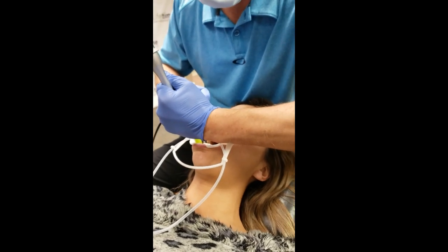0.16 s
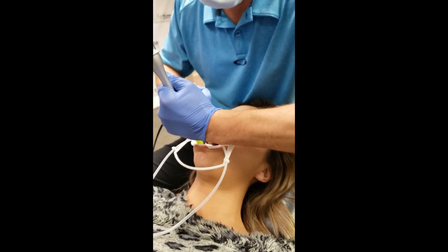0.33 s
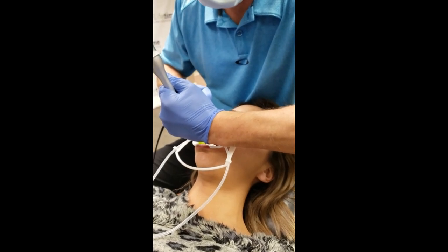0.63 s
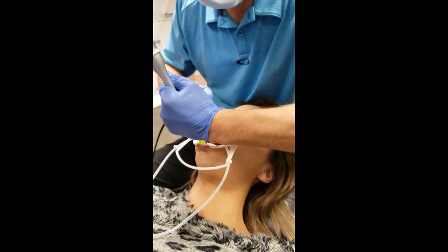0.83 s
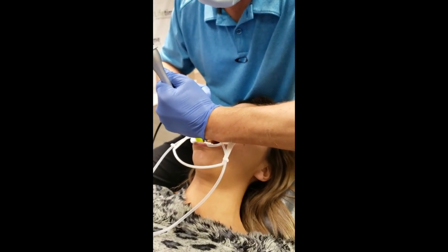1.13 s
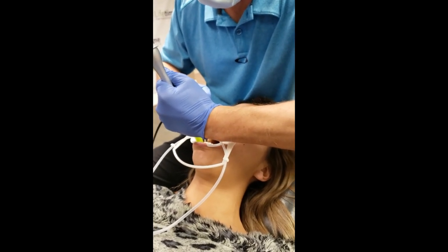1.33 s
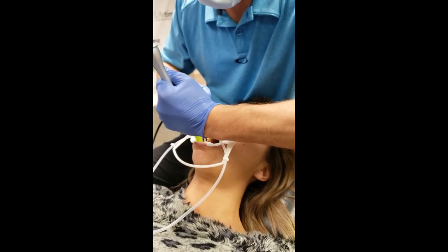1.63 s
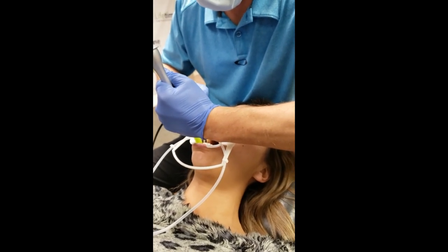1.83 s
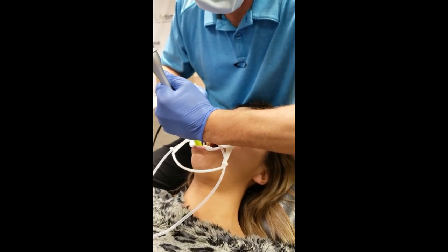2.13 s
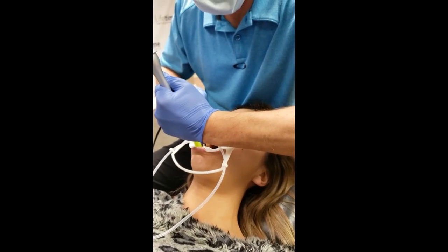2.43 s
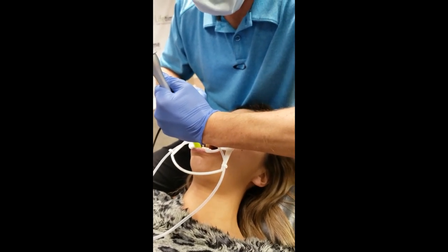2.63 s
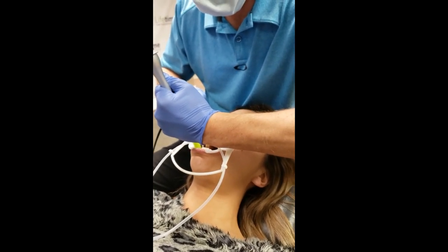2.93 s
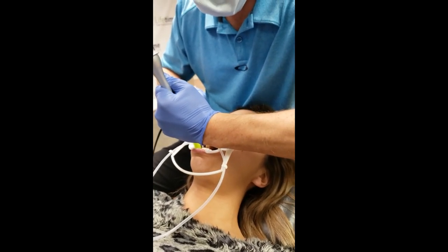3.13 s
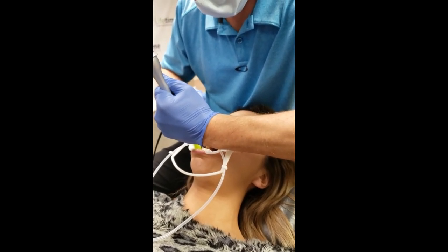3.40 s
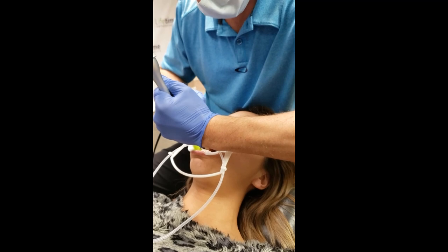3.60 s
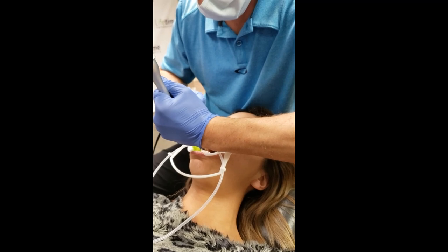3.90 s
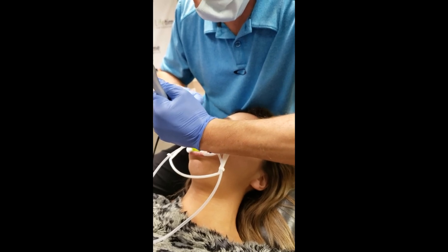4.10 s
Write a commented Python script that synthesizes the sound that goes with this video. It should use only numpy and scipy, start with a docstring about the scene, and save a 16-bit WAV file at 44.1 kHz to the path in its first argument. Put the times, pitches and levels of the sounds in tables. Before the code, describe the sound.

A dental suction tip works in an open mouth, heard close on a phone in stereo in a small treatment room. From the start there is a steady airy hiss over a hollow, resonant rush from mouth and tube, slightly damp at first, then drier. Around 0.6 seconds it surges briefly with a sharp spit; another spit comes at 0.9. From about 1.1 seconds water reaches the tip and the sound grows wetter, louder and rougher, with gurgling and crowded crisp pops and sprays, densest at roughly 1.6 to 2.5. Around 2.5 to 2.9 the spitting thins out into bright, fine mist-like sizzle, and the tip settles, making the mouth rush quieter and more hollow. A few last drops spit near 3.1 to 3.2. The thinner hiss wavers and weakens slightly to the end, about 4.3 seconds. Faint dull handling bumps occur near 1.5 and 2.7. The room tail is very short.

```python
"""In a small treatment room, a dental suction tip draws air and water from an open mouth, close to a phone.
One airflow, made of filtered noise, rings the mouth and the tube and hisses at the tip. Water reaches the tip
and makes it splutter and spit in short noise bursts, then thins to a film that is torn into bright mist.
The tip settles against the cheek and the mouth grows quieter. Soft handling bumps, low noise bursts, lie underneath.
"""
import sys
import numpy as np
from scipy import signal
from scipy.fft import rfft, irfft, next_fast_len
from scipy.io import wavfile
from scipy.ndimage import uniform_filter1d, map_coordinates

SR = 44100
rng = np.random.default_rng(int(sys.argv[2]) if len(sys.argv) > 2 else 0)


def unload_audio(sound):
    """Save the sound as a 16-bit wav file, at the path given as the first command line argument."""
    columns = np.transpose(np.atleast_2d(sound))
    # keep every value between -1 and 1, then stretch to whole-number steps
    steps = np.round(np.clip(columns, -1, 1) * 32767)
    wavfile.write(sys.argv[1], SR, steps.astype(np.int16))


N = 187510

# strength of the airflow, before each sound's own offset: (t/s, level/dB)
AIRFLOW = [(0.02, -37), (0.53, -36.5), (0.6, -33), (0.72, -34.5), (0.85, -38), (1.0, -36.5), (1.1, -36),
           (1.22, -37), (1.28, -34), (1.33, -35.5), (1.7, -35), (2.0, -34), (2.25, -34.5), (2.42, -35),
           (2.65, -33.5), (2.82, -35), (3.12, -38.5), (3.45, -37.5), (3.7, -37), (3.97, -36.5), (4.05, -39),
           (4.22, -39.5)]
# rush in the mouth above the airflow, as the opening around the tip shifts: (t/s, level/dB)
OPENING = [(0, -0.5), (.45, 0.5), (.6, 0.5), (2.6, 0), (2.72, -1.5), (2.85, -0.2), (3.0, 0.3), (3.12, 0),
           (3.33, 3), (3.5, 0.6), (3.82, 0.1), (3.97, -1.5), (4.1, 2), (4.2, 0.2)]
# hiss and mist above the airflow, as more or less water feeds the tip: (t/s, level/dB)
WATER_FEED = [(0, 2.2), (.5, 0.5), (.6, 0), (.85, 2), (1.0, 0.5), (1.1, 0.5), (1.55, -2.5), (1.78, -1),
              (1.86, 0), (1.93, -2.5), (2.0, -0.5), (2.1, -1), (2.42, -1.6), (2.68, -0.7), (2.8, -1.8),
              (2.9, -1), (3.0, -0.8), (3.2, 1.5), (3.45, 0.1), (3.63, 0), (3.88, -3), (3.98, -0.5),
              (4.06, 1.5), (4.2, 2)]
# how far the hollows move to their late depths: (t/s, share 0-1)
HOLLOW_DEEPENING = [(2.58, 0.2), (2.68, 0.8), (2.75, 0), (2.86, 1), (2.95, 1), (3.02, .8), (3.33, 0.9),
                    (3.6, 0.5), (3.8, .75), (3.95, 0.5), (4.1, 1)]
# resonances of the mouth, before the scaling in cavity():
# (f/Hz, width/Hz, left level/dB, right level/dB, change when seated/dB)
MOUTH_MODES = [(162.8, 55, -15, -15.5, -1), (223, 128, -15, -15.5, -1), (319, 120, -16.5, -15, -3),
               (409.2, 59, -11, -15, 1.5), (522.5, 56, -15, -8.5, 4), (676, 112, -13.5, -24, 0.5),
               (856, 600, -12, -18.5, -1), (1020, 270, -5.5, -5.5, -3.5), (1100.6, 81, -3, -4, 3),
               (1211, 115, 1, -6, -0.5), (1284, 310, -3.5, -27, -0.5), (1397, 294, -19, -9.5, 1),
               (1629.5, 33, -14, -5.5, 4)]
# resonances of the tip and tube, same columns and scaling:
# (f/Hz, width/Hz, left level/dB, right level/dB, change when seated/dB)
TUBE_MODES = [(2020, 134, -8.5, -7, 3), (2330, 520, -2.5, -5.5, 5), (2640, 360, -4.5, -6, -3),
              (2970, 790, -8, -4, 4.5), (3534, 890, -4.5, -9, 8), (4365, 440, -2, -9.5, 4.5),
              (4920, 550, -13, -1, 3.5), (5454, 450, 2.5, -4, 0.5), (6200, 1100, -2, -0.5, 1.5),
              (6910, 500, -1.5, -0.5, 9.5), (7434, 250, -0.5, -7, 5)]
# colour of the hiss from a dry tip: (f/Hz, left level/dB, right level/dB)
DRY_COLOUR = [(100, -74, -65), (4470, -31, -20), (5800, -18, -13), (6680, -1.5, -1.5), (6950, -22, -16),
              (7600, -11, -11), (8230, -26, -30), (8780, -9, -11), (9200, -7, -2.5), (10000, -16, -4),
              (10500, -7, -4), (11750, -7.5, 3.5), (13500, -4, -4.5), (14200, -7, -15), (14700, -3, -27),
              (15350, -4.5, -11)]
# colour of the hiss from a wet tip: (f/Hz, left level/dB, right level/dB)
WET_COLOUR = [(100, -90, -87), (4400, -36, -45), (6400, -12.5, -16), (7500, -12, -21), (8030, -14, -9.5),
              (8920, -20, -5.5), (9350, -13.5, -12.5), (10100, -16.5, -17), (10900, -14, -19),
              (11440, -12.5, -7.5), (11940, -15, 4), (12350, -8, -4), (13200, -14.5, -8), (14300, -10, -15),
              (15500, -9, -14.5)]
# colour of the mist: (f/Hz, left level/dB, right level/dB)
MIST_TINT = [(2000, -65, -55), (9150, -24, -24), (11900, -5, 7.5), (13800, -10, -6), (14600, 3, -5),
             (15300, 5.5, -7), (16100, -1, -3)]
# largest drops snatched into the tip; level before the pop and spray offsets, decay of the spray:
# (t/s, level/dB, decay/s)
LARGE_SPITS = [(0.6257, -12.5, 0.0012), (.9015, -14, .001), (1.0657, -22, .002), (1.0827, -19, .003),
               (1.1181, -18, 0.0011), (1.177, -14, 0.0017), (1.203, -14, 0.0022), (1.218, -17, 0.0024),
               (1.293, -16, .001), (1.3183, -16, 0.0013), (1.332, -16, .001), (1.3483, -20, .0015),
               (1.412, -20, .008), (1.483, -16, .002), (1.5815, -20, 0.0017), (1.5912, -13, .0015),
               (1.6212, -13.5, 0.0018), (1.633, -14, .0015), (1.66, -13.5, .003), (1.69, -13, .0015),
               (1.701, -15, 0.0023), (1.73, -13, .0012), (1.7809, -16, .0015), (1.8163, -17, .003),
               (1.8362, -13, 0.0017), (1.853, -15, .0013), (1.861, -21, .002), (1.8783, -10, .0009),
               (1.9101, -12, .003), (1.9706, -20, .0015), (1.985, -12, 0.0034), (2.0035, -13, .003),
               (2.02, -14, 0.0016), (2.0525, -23, .002), (2.0682, -11, .0015), (2.0954, -19, .0012),
               (2.1291, -18, .002), (2.1528, -21, .002), (2.1757, -19, .002), (2.223, -13.5, 0.0053),
               (2.3151, -15, 0.00091), (2.3395, -17, .003), (2.3545, -12.5, 0.0032), (2.394, -18, .001),
               (2.4196, -22, .0012), (2.4912, -15, .0012), (2.5252, -12, .0014), (2.5546, -14, .004),
               (2.615, -14, .002), (3.084, -14, .002), (3.128, -17, .002), (3.205, -14, 0.003)]
# colour of a spit: (f/Hz, left level/dB, right level/dB)
SPIT_TINT = [(100, -80, -79), (1800, -19, -27), (2600, -22, -19), (4400, -29, -26), (6300, -17, -19),
             (7900, -19, -12), (8900, -23, -13.5), (10600, -14, -11), (11270, -18, -4), (11700, -13, 1.5),
             (12700, -12, -1.5), (13900, -17, -14), (15500, -5.5, -15)]
# narrow hollows at the left port, before they swell; a mixed depth above 0 dB counts as none:
# (f/Hz, width/Hz, dry depth/dB, wet depth/dB, late depth/dB)
HOLLOWS_LEFT = [(557, 200, -5.5, -3.5, -13.5), (1835, 170, -4, -14, -32), (2830, 250, -7, 0, -8),
                (3180, 200, -6, -3.5, -11), (3830, 310, -0.5, -9, -4.5), (4830, 140, 1, -2, -7),
                (5670, 250, -4, -0.5, -6), (6880, 280, -2, 0, -1.5), (7780, 250, -3, -7, -8),
                (8300, 240, -6, 0, 5), (9040, 320, -8, -1, -11), (9530, 300, 4, -4, -8),
                (10680, 330, 5, -4, -2), (12850, 320, 2, -11, -5)]
# the same at the right port: (f/Hz, width/Hz, dry depth/dB, wet depth/dB, late depth/dB)
HOLLOWS_RIGHT = [(547, 223, -2.5, -3, -18), (1850, 196, -3, -4, -30), (3230, 260, -3, -2, -8),
                 (3960, 210, 5, -7, -14), (4920, 170, -3, -3, -6), (5700, 170, 1, -1, -7),
                 (6930, 280, -4, -4, -1), (7350, 280, 2, -2, -9), (8200, 270, -13, -0.5, -9),
                 (8680, 220, -1, -1.5, -3.5), (10770, 360, 4, -6, -9), (14600, 500, -5, -4, -3)]
# soft handling bumps: (t/s, level/dB, decay/s)
HANDLING = [(.63, -57, 0.018), (.78, -60, .025), (1.481, -48, 0.028), (1.531, -58, 0.023), (1.69, -63, .04),
            (2.2, -58, .025), (2.723, -46, 0.01), (3.42, -60, 0.024), (4.02, -69, .02)]
# colour of a bump: (f/Hz, left level/dB, right level/dB)
BUMP_TINT = [(15, -12, -9), (45, -3, 3), (84.5, -6, 7), (169, 0, -2), (400, -30, -22), (1200, -80, -93)]
# likeness of the two microphone ports, coherence held to at most 0.95 in use:
# (f/Hz, coherence 0-1, left lead/rad)
PORT_LIKENESS = [(40, .2, -0.3), (85, .4, 0), (140, .95, 0), (520, 0.55, 0.1), (960, 0.8, -0.26),
                 (1530, 0.53, -1), (2150, 0.76, .5), (2900, 0, 1), (3750, 0.61, 0.46), (5000, 0.04, 0),
                 (5530, 0.27, 0.65), (6480, 0.62, 3.5), (7470, 0.12, 3.5), (8500, 0, 7), (9900, 0.5, 5.0),
                 (11650, 0.33, 6.5), (12100, 0.7, 8), (14100, .45, 8.5), (15400, .55, 8.0)]

T = np.arange(N) / SR
SIZE = 2 * next_fast_len(N // 2 + 8192)  # padded, so that filters can ring out
HZ = np.maximum(np.arange(SIZE // 2 + 1) * SR / SIZE, 1)  # at least 1 Hz, so its log is finite

# offsets from the airflow, and changes as the tip gets wet, films over or is seated (dB)
MOUTH_DB, MOUTH_SEATED_DB = -2.5, -3
TUBE_DB, TUBE_SEATED_DB = -.5, -0.37
TIP_DB, TIP_WET_DB, TIP_FILM_DB, TIP_SEATED_DB = 0.57, 4.5, 1, 1.5
MIST_DB = 4

# stages, each a smooth change: (start/s, length/s)
DRAINS = (0.045, 0.44)  # the last water leaves the damp tip
FLOODS = (1.17, 0.38)  # fresh water covers the tip
SPLUTTERS = (1, 0.84)  # it breaks up into drops
FILMS = (2.434, 0.27)  # it thins to a film
SEATS = (2.647, 0.34)  # the tip settles against the cheek
GUSH = (0.47, 0.16, 0.17)  # a little water passes through: (start/s, length/s, wet share 0-1)
DAMP_SHARE = 0.18  # wet share of the tip before it drains, 0-1
SPLUTTER_DRY, SPLUTTER_FLOODED, SPLUTTER_FILM = 0.4, 0.53, 0.36  # share of hiss in drops, 0-1

# smaller drops come at random; this is their rate when fully flooded
SMALL_SPITS_PER_S, SMALL_SPIT_DB, SMALL_SPIT_SPREAD_DB = 59, -37, 1
SPIT_CLUSTER_DB, SPIT_CLUSTER_PER_S = 5, 9.1  # small drops swell and ebb in bunches
SPIT_RISE_S, SMALL_SPIT_DECAY_S = 0.00022, .0012
SPIT_POP_DB, SPIT_POP_S, SPIT_SPRAY_DB = -4.5, 0.00046, -0.5  # sharp pop and brief spray

HOLLOW_DRIFT, HOLLOW_DRIFT_PER_S = .01, 12  # share by which their pitch wanders
HOLLOW_SWELL, HOLLOW_SWELL_PER_S = .5, 24  # share by which each depth comes and goes
# share by which all hollows at both ports deepen and fade together at random
SHARED_SWELL, SHARED_SWELL_PER_S = .3, 16
ROOM_DB, ROOM_DECAY_S, ROOM_TOP_HZ = -8, 0.015, 7600
BUMP_RISE_S = 0.0029
TOP_HZ = 15680  # where the phone cuts the top


def air_rush(flow_db, seat, splutter):
    """Air drawn past the teeth rings the mouth and the tube; water in the way makes it gurgle."""
    gurgle = splutter * walk(70)
    opening_db, = curves(OPENING)
    mouth_db = flow_db + opening_db + MOUTH_DB + MOUTH_SEATED_DB * seat
    tube_db = flow_db + TUBE_DB + TUBE_SEATED_DB * seat
    mouth_strength = undb(mouth_db + 1.65 * gurgle + 1.0 * walk(35.35))
    tube_strength = undb(tube_db + 1.4 * gurgle + 1.17 * walk(300))
    mouth = cavity(mouth_strength, seat, MOUTH_MODES, band=(800, 1600), seated_damping=0.61)
    tube = cavity(tube_strength, seat, TUBE_MODES, band=(2100, 7400), seated_damping=0.64)
    return waver(mouth, depth=0.0117, rate=8) + waver(tube, depth=.015, rate=6)


def cavity(strength, seat, modes, band, seated_damping):
    """Air rings a cavity; with the tip seated less leaks out and the resonances sharpen."""
    loose_gain = resonances(modes, 0, 0.92)
    seated_gain = resonances(modes, 0.77, seated_damping)  # 0.77 of the listed level changes
    loose = turbulence(strength * np.sqrt(1 - seat), loose_gain, band)
    seated = turbulence(strength * np.sqrt(seat), seated_gain, band)
    return loose + seated


def resonances(modes, seated, damping):
    """Gain at each port of a set of steep-sided resonances; damping scales their widths."""
    power = 0
    for hz, width, left_db, right_db, change_db in modes:
        bell = 1 / (1 + ((HZ ** 2 - hz ** 2) / (HZ * width * damping)) ** 2)
        port_gain = undb([[left_db], [right_db]]) * undb(seated * change_db)
        power = power + (port_gain * bell) ** 2
    return np.sqrt(power)


def waver(sound, depth, rate):
    """Shifting water changes a cavity's size, so all its resonances drift together by a small share."""
    # reading the sound a little early or late bends its pitch
    place = np.arange(N) + depth * SR / rate * walk(rate)
    return np.array([map_coordinates(port, [place], order=3, mode="mirror") for port in sound])


def tip_hiss(flow_db, seat, wet, film, splutter):
    """The jet at the rim: smoother when dry, louder and more broken into droplets as water crosses it."""
    tip_db = flow_db + TIP_DB + TIP_WET_DB * wet + TIP_FILM_DB * film + TIP_SEATED_DB * seat
    shower = droplets(rate=500, spread_db=0.5, decay=0.0016)
    strength = undb(tip_db - 1.9 * splutter) * np.sqrt(1 - splutter + splutter * shower)
    band = (11000, 13500)
    dry_hiss = turbulence(strength * np.sqrt(1 - wet), undb(over_hz(DRY_COLOUR)), band)
    wet_hiss = turbulence(strength * np.sqrt(wet), undb(over_hz(WET_COLOUR)), band)
    return dry_hiss + wet_hiss + mist(flow_db, film, shower)


def mist(flow_db, film, shower, grainy=0.28):
    """Once the water thins to a film, it is torn into a very high sizzle that follows the same droplets."""
    strength = film * undb(flow_db + MIST_DB) * np.sqrt(1 - grainy + grainy * shower)
    return turbulence(strength, undb(over_hz(MIST_TINT)), band=(14200, 15800))


def droplets(rate, spread_db, decay):
    """Power of a shower of small drops of uneven size, mean 1; each drop's power dies away over decay s."""
    falls = rng.random(N) < rate / SR
    size_db = spread_db * np.clip(rng.standard_normal(N), -2, 2)
    hits = falls * undb(size_db) ** 2
    power = signal.lfilter([1], [1, -np.exp(-1 / (decay * SR))], hits + 1e-18)
    return power / power.mean()


def spits(flooded):
    """Drops burst at the rim: large ones pop and spray, small ones come in bunches while it is flooded."""
    falls = rng.random(N) < flooded * SMALL_SPITS_PER_S / SR
    spread_db = SMALL_SPIT_SPREAD_DB * rng.uniform(-2, 2, N)
    bunch_db = SPIT_CLUSTER_DB * walk(SPIT_CLUSTER_PER_S)
    drops = falls * undb(SMALL_SPIT_DB + spread_db + bunch_db)
    small_burst = burst(0, SPIT_RISE_S, SMALL_SPIT_DECAY_S)
    power = signal.fftconvolve(drops ** 2, small_burst ** 2)[:N]
    for start, db, decay in LARGE_SPITS:
        pop = undb(db + SPIT_POP_DB) * burst(start, SPIT_RISE_S, SPIT_POP_S)
        spray = undb(db + SPIT_SPRAY_DB) * burst(start, SPIT_RISE_S, decay)
        power = power + pop ** 2 + spray ** 2
    return turbulence(np.sqrt(abs(power)), undb(over_hz(SPIT_TINT)))


def water():
    """State of the tip, each 0-1: how wet it is, how flooded, how far filmed over, how much it splutters."""
    start, length, share = GUSH
    gush = share * np.sin(np.pi * stage(start, length))
    damp = DAMP_SHARE * (1 - stage(*DRAINS))
    wet = np.clip(damp + gush + stage(*FLOODS), 0, 1)
    film = stage(*FILMS)
    flooded = stage(*SPLUTTERS) * (1 - film)
    splutter = SPLUTTER_DRY * (1 - flooded - film) + SPLUTTER_FLOODED * flooded + SPLUTTER_FILM * film
    return wet, flooded, film, np.clip(splutter, 0, 1)


def hollows(sound, table, wet, deepening, shared_swell):
    """Narrow hollows at one port wander in pitch; their depths shift between dry, wet and late values."""
    hz, s, frames = signal.stft(sound, SR, nperseg=1536, noverlap=1152)
    at = np.minimum((s * SR).astype(int), N - 1)  # sample at each frame
    for centre, width, dry_db, wet_db, late_db in table:
        pitch = centre * (1 + HOLLOW_DRIFT * walk(HOLLOW_DRIFT_PER_S)[at])
        early_db = dry_db + wet[at] * (wet_db - dry_db)
        swell = np.exp(shared_swell + HOLLOW_SWELL * walk(HOLLOW_SWELL_PER_S))[at]
        depth_db = np.minimum(early_db + deepening[at] * (late_db - early_db), 0) * swell
        frames = frames * undb(depth_db / (1 + (2 * (hz[:, None] - pitch) / width) ** 4))
    return signal.istft(frames, SR, nperseg=1536, noverlap=1152)[1][:N]


def room(direct):
    """A short, dull tail of fading noise from the nearby walls and cabinets."""
    age = T[:SR // 4]
    tail = rng.standard_normal((2, len(age))) * np.exp(-age / ROOM_DECAY_S) * (age > .003)
    tail *= undb(ROOM_DB) / np.sqrt(np.sum(tail ** 2, axis=1, keepdims=True))
    tail = signal.sosfilt(signal.butter(2, ROOM_TOP_HZ, fs=SR, output="sos"), tail)
    return direct + signal.fftconvolve(direct, tail, axes=1)[:, :N]


def bumps():
    """Dull, faint thuds of handling: short bursts of low noise."""
    strength = sum(undb(db) * burst(start, BUMP_RISE_S, decay) for start, db, decay in HANDLING)
    return turbulence(strength, undb(over_hz(BUMP_TINT)))


def turbulence(strength, gain, band=None):
    """Noise rings a filter; strength 1 gives rms 1 over both ports, or for their average within a band."""
    coherence, lead = over_hz(PORT_LIKENESS)
    coherence = np.clip(coherence, 0, .95)
    # a shared noise and a noise of opposite sign make the ports partly alike
    common, apart = rfft(rng.standard_normal((2, N)) * strength, SIZE)
    sides = np.array([[1], [-1]])
    ports = common * np.sqrt((1 + coherence) / 2) + sides * apart * np.sqrt((1 - coherence) / 2)
    ports = ports * np.exp(.5j * sides * lead)
    power = np.mean(gain ** 2, axis=0)
    # the phase that makes a filter of this mean power ring after its cause, never before
    cepstrum = irfft(np.log(power + 1e-10))
    phase = rfft(cepstrum[:SIZE // 2], SIZE).imag
    if band:
        low, high = band
        power = (power + coherence * np.cos(lead) * gain[0] * gain[1]) / 2
        power = power * (HZ > low) * (HZ < high)
    return irfft(ports * gain * np.exp(1j * phase))[:, :N] / np.sqrt(power.mean())


def walk(rate):
    """Random levels held 1 / rate s and smoothed twice; spread near 1."""
    k = max(int(SR / rate), 1)
    steps = np.repeat(rng.standard_normal(N // k + 1), k)
    return 1.3 * uniform_filter1d(uniform_filter1d(steps, k), k)[:N]


def burst(start, rise, decay):
    """Envelope of one short burst: a quick rise, then an exponential decay, top at 1."""
    age = np.maximum(T - start, 0)
    shape = (1 - np.exp(-age / rise)) * np.exp(-np.minimum(age / decay, 50))
    return shape / shape.max()


def stage(start, length):
    """A smooth change from 0 to 1."""
    return np.sin(np.pi / 2 * np.clip((T - start) / length, 0, 1)) ** 2


def curves(table):
    """Each column of a table, joined by straight lines in time."""
    s, *columns = np.transpose(table)
    return [np.interp(T, s, c) for c in columns]


def over_hz(table):
    """Each column of a table, joined by straight lines over log frequency."""
    hz, *columns = np.transpose(table)
    return np.array([np.interp(np.log(HZ), np.log(hz), c) for c in columns])


def undb(db):
    """Decibels to gain."""
    return 10 ** (np.asarray(db) / 20)


def scene():
    """One airflow drives rush and hiss; they and the spits sound in the room, over the handling bumps."""
    flow_db, = curves(AIRFLOW)
    feed_db, = curves(WATER_FEED)
    deepening, = np.clip(curves(HOLLOW_DEEPENING), 0, 1)
    seat = stage(*SEATS)
    wet, flooded, film, splutter = water()
    rush = air_rush(flow_db, seat, splutter)
    hiss = tip_hiss(flow_db + feed_db, seat, wet, film, splutter)
    left, right = room(rush + hiss + spits(flooded))
    shared_swell = SHARED_SWELL * walk(SHARED_SWELL_PER_S)
    left = hollows(left, HOLLOWS_LEFT, wet, deepening, shared_swell)
    right = hollows(right, HOLLOWS_RIGHT, wet, deepening, shared_swell)
    return np.array([left, right]) + bumps()


def record(dry):
    """The phone rolls off the deep bass and cuts the top steeply."""
    thin = signal.sosfilt(signal.butter(2, 45, "high", fs=SR, output="sos"), dry)
    return signal.sosfilt(signal.ellip(12, .1, 80, TOP_HZ, fs=SR, output="sos"), thin)


dry = scene()
out = record(dry)
unload_audio(out)
```